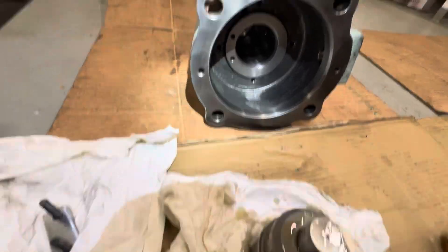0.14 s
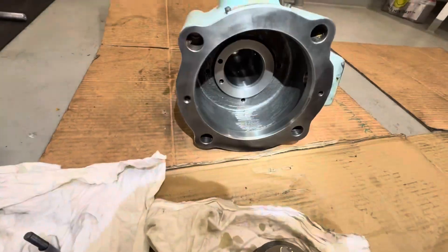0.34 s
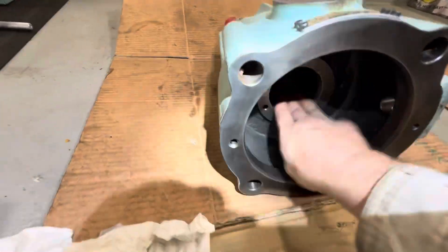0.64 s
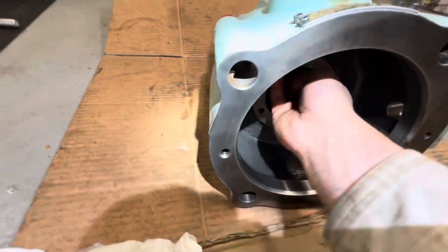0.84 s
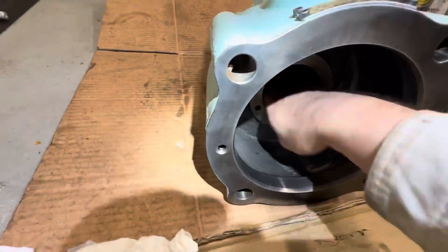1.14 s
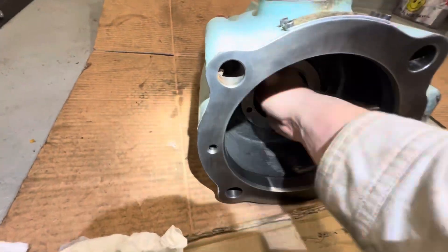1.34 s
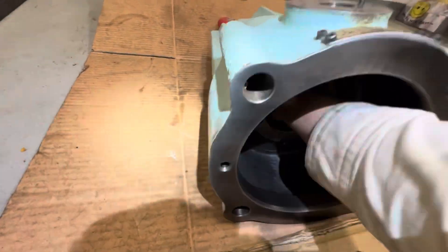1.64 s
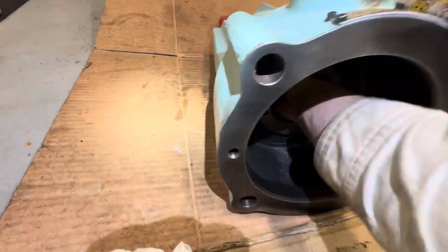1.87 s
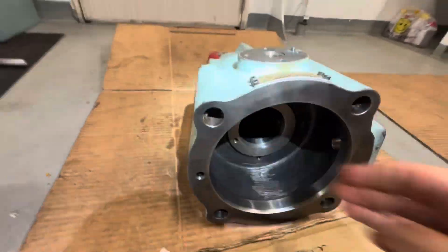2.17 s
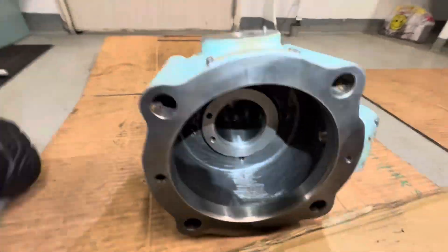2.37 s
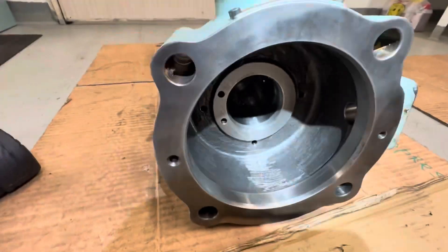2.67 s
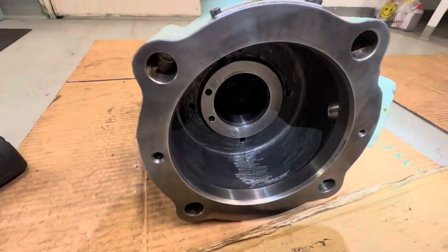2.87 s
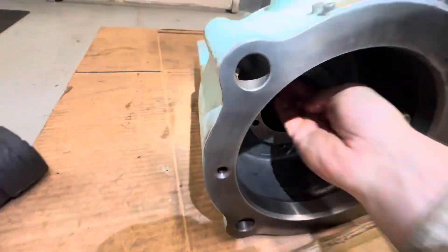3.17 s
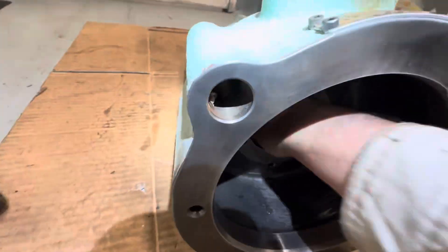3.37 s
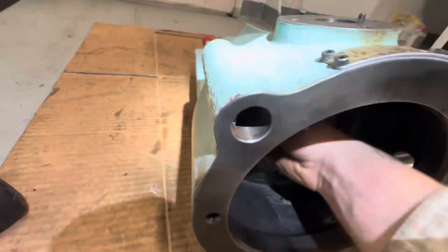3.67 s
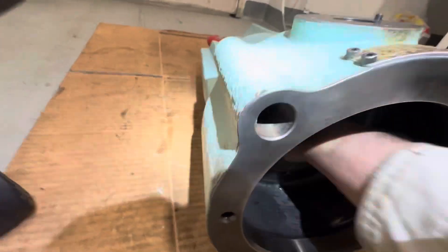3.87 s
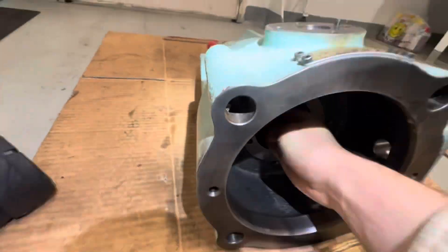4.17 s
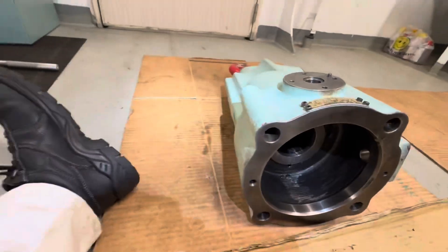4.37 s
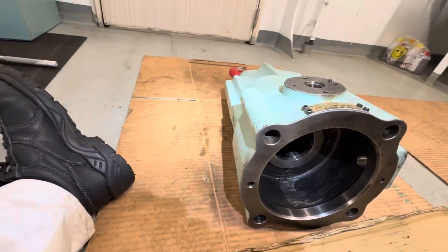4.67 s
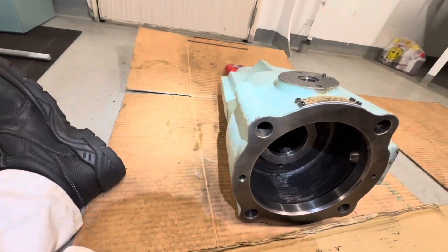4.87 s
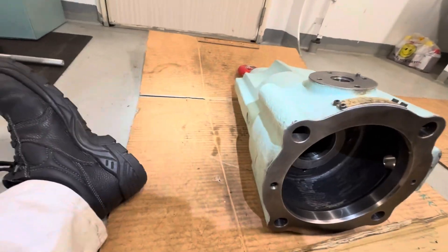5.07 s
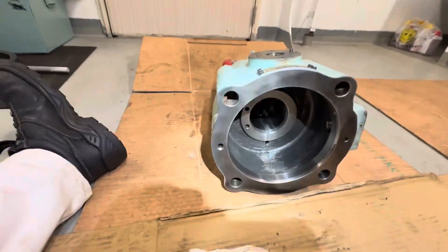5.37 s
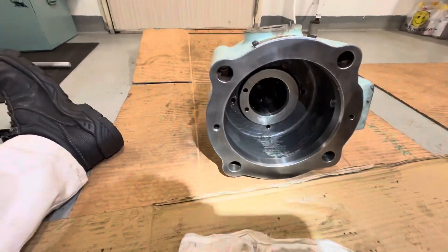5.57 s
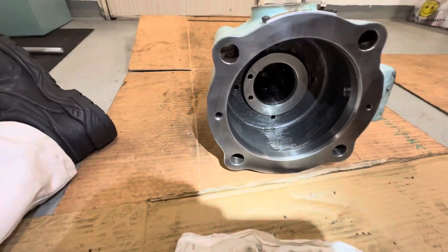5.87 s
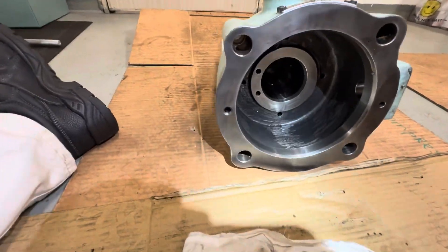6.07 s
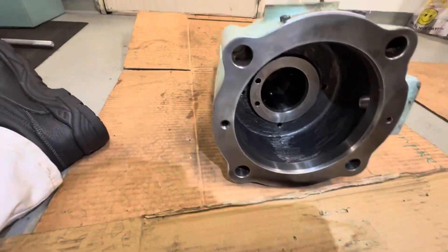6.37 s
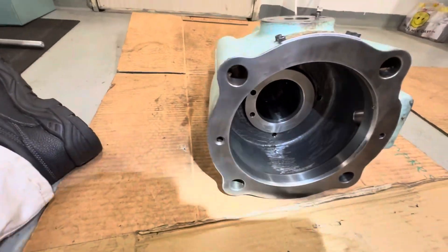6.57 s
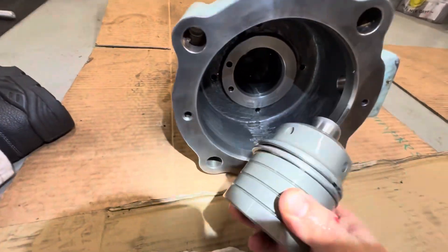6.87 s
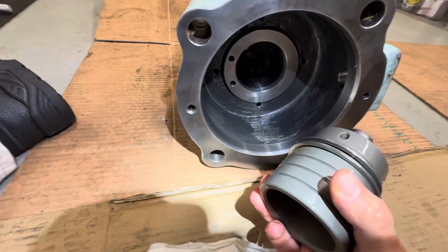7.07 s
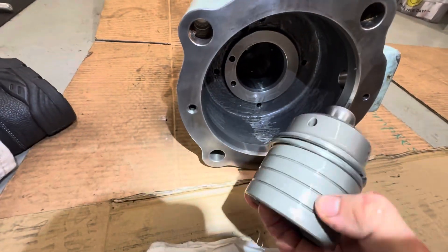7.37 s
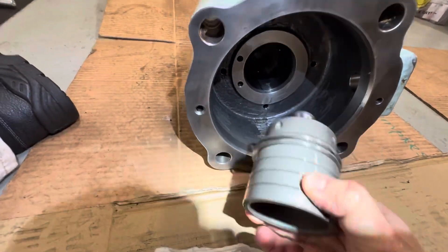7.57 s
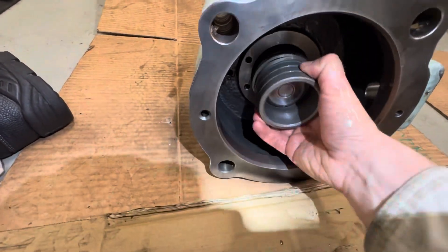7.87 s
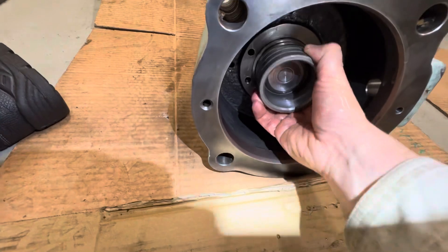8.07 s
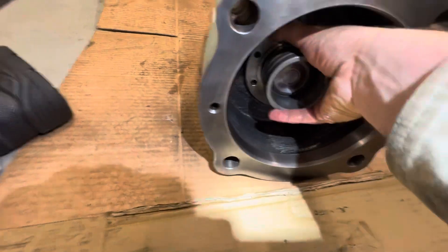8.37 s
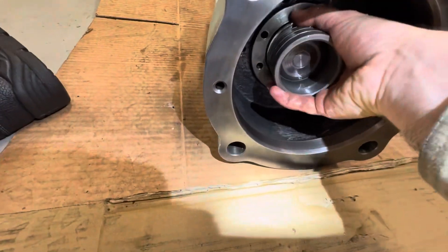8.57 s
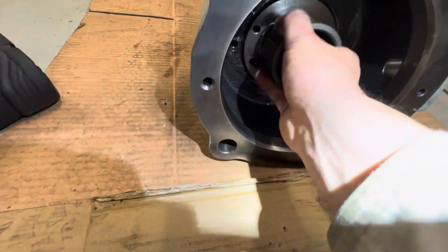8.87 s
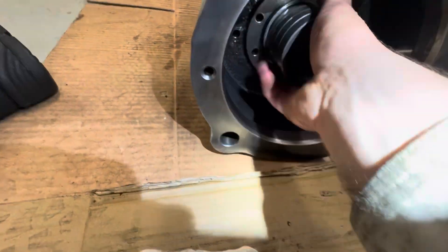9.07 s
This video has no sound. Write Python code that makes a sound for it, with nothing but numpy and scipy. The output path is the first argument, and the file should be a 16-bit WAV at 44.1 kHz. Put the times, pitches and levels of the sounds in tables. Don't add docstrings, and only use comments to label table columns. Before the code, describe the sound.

Inside a steel ship workshop, engine rumble drones throughout, with a wavering low boom, a higher hum and soft ventilation hiss. Faint hands scuff over cardboard, then dry rags rustle. Late on, small steel parts click and knock, a dull thud follows, and a piston slides into its bore with a barely audible rubbing hiss. One handheld phone microphone.

```python
import sys
import numpy as np
from scipy import signal
from scipy.fft import rfft, irfft, next_fast_len
from scipy.io import wavfile
from scipy.ndimage import uniform_filter1d, map_coordinates

SR = 44100
rng = np.random.default_rng(int(sys.argv[2]) if len(sys.argv) > 2 else 0)


def makeup_ratio(level_db):
    decades = np.asarray(level_db, float) / 20
    return 10 ** decades


def transcribe(signal):
    frames = np.atleast_2d(signal).T
    limited = np.clip(frames, -1, 1)
    pcm = np.round(limited * 32767).astype(np.int16)
    wavfile.write(sys.argv[1], SR, pcm)


N = 406144

# [t/s, peak level/dB, f/Hz, length/s]
BOOM_SWELLS = [(0.07, -36.0, 86.8, 0.055), (0.23, -29, 88.1, 0.07), (0.58, -34.0, 87.8, 0.32),
               (1.1, -36, 85.4, 0.047), (1.47, -45, 86.9, 0.29), (1.83, -34.5, 89.93, 0.063),
               (2.12, -35.5, 89.2, 0.28), (2.59, -38, 89.5, 0.061), (3.02, -37, 86.33, 0.37),
               (3.31, -33, 87.7, 0.06), (3.72, -30, 86.84, 0.19), (3.98, -32, 85.8, 0.17),
               (4.1, -28, 85.76, 0.068), (4.31, -28.5, 86.65, 0.07), (4.47, -34.5, 84.0, 0.057),
               (4.72, -36, 88, 0.034), (4.9, -33.5, 88.5, 0.18), (5.14, -27.0, 87.2, 0.12),
               (5.45, -38, 88.2, 0.65), (5.66, -34, 87.7, 0.12), (5.94, -30, 87.9, 0.055),
               (6.47, -31, 86.17, 0.11), (6.87, -34.5, 87.2, 0.68), (7.33, -36.5, 86.5, 0.21),
               (7.75, -33.5, 87.46, 0.23), (8.07, -31, 87.6, 0.066), (8.32, -35, 87.87, 0.52),
               (8.46, -27, 87.3, 0.043), (8.76, -28.5, 85.54, 0.11), (9.03, -27, 85.7, 0.12)]
# [t/s, peak level/dB, f/Hz, length/s]
HUM_SWELLS = [(0.14, -43.0, 166.6, 0.16), (0.38, -42.5, 166.8, 0.063), (0.66, -46.0, 165.2, 0.44),
              (1.21, -49.5, 163.7, 0.48), (2.06, -47.5, 165.4, 0.4), (2.47, -42.0, 162.6, 0.16),
              (2.82, -53.5, 165.0, 0.99), (3.57, -42.5, 165.5, 0.07), (4.26, -42.5, 164.4, 0.055),
              (4.54, -40, 164.6, 0.21), (4.65, -51, 165.3, 0.05), (4.92, -42.5, 164.0, 0.12),
              (5.18, -50.5, 164.3, 0.22), (5.37, -42, 165.9, 0.056), (5.65, -42, 164.5, 0.36),
              (5.93, -41, 164.4, 0.087), (6.55, -46.5, 163.6, 0.51), (7.3, -44.5, 164.0, 0.63),
              (8.0, -44.5, 164.9, 0.25), (8.2, -50.5, 165.0, 0.06), (8.32, -40.5, 164.3, 0.08),
              (8.53, -46.5, 162.3, 0.13), (8.91, -44.5, 165.0, 0.13), (9.14, -41.5, 161.6, 0.2)]
BOOM_REST_DB, HUM_REST_DB = -39.5, -51

# [f/Hz, width/Hz, level/dB]
DEEP_MODES = [(26.1, 5.5, -11), (36.3, 7.7, 0.5), (47.3, 11, -13), (57.7, 17, 1.5)]
UPPER_MODES = [(118.3, 10, 0.5), (140, 14, -5.5), (175.8, 13, -7.5), (200.4, 11.5, -5), (214, 8.2, -10.5),
               (246.3, 6.7, -10.5)]
DEEP_DB, UPPER_DB = -35.5, -41
SETTLE_S = 0.35

# [f/Hz, level/dB]
DUCT_COLOUR = [(130, -27.5), (220, -4), (309, -6.5), (348, -12), (374, -8), (574, -18.5), (706, -20),
               (772, -23), (831, -17.5), (1040, -22), (1900, -19.5), (2410, -27), (3530, -27.5),
               (5340, -41), (7500, -48), (9750, -78), (16500, -120)]
# [f/Hz, width/Hz, level/dB]
PANEL_MODES = [(297, 21.5, 4.5), (366, 23, -0.5), (500, 10, 2), (536, 19, 4), (735, 16, 5.5),
               (813, 27, 3.5), (913, 32, 3.5), (991, 15, 5), (1350, 27, 2), (1562, 27, 2), (2804, 23, 2),
               (3490, 110, -10), (3820, 38, -1.5), (4500, 200, 3.5), (7350, 15, 1.5)]
AIR_DB = -49.5

# [f/Hz, level/dB]
WHINES = [(9449, -99), (9993, -102), (10168, -103)]
# [t/s, level/dB]
PHONE_TURN = [
    (0, -14.5),
    (4, -9),
    (7.5, -0.5),
    (8, -3),
    (9.21, -3),
]

# [t/s, peak level/dB, body level/dB, sheen level/dB], the last two relative
SCUFFS = [(0.419, -63, 0, -1.5), (0.472, -69.5, -8, -0.5), (1.366, -63, 3, -2.5), (1.424, -66.5, 0, 1),
          (1.53, -58.5, 1, -2), (1.672, -64, -1, 0), (1.852, -57, -3, 3), (2.108, -58.5, -1, 2),
          (2.295, -61.5, 0, 2), (2.451, -59.5, -0.5, 2.5), (2.596, -59.5, 0, 2), (2.736, -61, -1, 1),
          (2.963, -47, -0.5, 0), (3.171, -62.5, 4.5, -1.5), (5.837, -60.5, -4, -3), (6.298, -65, -4, 0),
          (6.424, -54, 2.5, -3), (6.553, -59.5, -0.5, 5), (6.705, -54, -4.5, 2.5), (7.293, -48.5, 0.5, 0.5),
          (7.474, -61, -6, 0), (7.579, -53, 0, 0)]
# [f/Hz, level/dB]
EDGE_COLOUR = [(2000, -38), (3500, 8.5), (6000, -2), (8000, -6), (12000, -25)]
SHEEN_COLOUR = [(5000, -29), (9000, -1), (12000, -4.5), (15700, 0.5)]
BODY_COLOUR = [(300, -31), (650, 1.5), (1100, -2), (1500, 0.5), (1900, 1.5), (2500, -7), (3600, -7),
               (5500, -36.5)]
EDGE_RISE_S, EDGE_HOLD_S = 0.002, 0.034
BODY_RISE_S, BODY_HOLD_S = 0.005, 0.032
SCUFF_T60_S = 0.34

# [t/s, peak level/dB, centre f/Hz, 60 dB fade/s]
RUSTLES = [(4.122, -67, 6013, .1), (4.4, -69, 6923, .08), (4.693, -63, 6000, 0.08),
           (5.578, -62.5, 4990, .15), (5.70, -69.5, 15580, .3), (5.74, -71, 15600, .3),
           (5.918, -70.5, 14500, .06), (5.918, -61, 5870, 0.24), (5.94, -69, 7200, 0.14),
           (6.034, -72, 14500, .06), (6.034, -58, 4510, 0.2), (6.045, -68, 7000, 0.19),
           (6.368, -60.5, 5810, 0.24), (6.369, -69, 14500, .1), (6.373, -54, 2500, 0.16),
           (6.585, -59, 1800, 0.093)]
# [t/s, peak level/dB, f/Hz, 60 dB fade/s]
TICKS = [(6.9993, -58, 6780, 0.007), (6.9998, -58, 8600, .009), (6.9993, -62, 10000, .004),
         (6.9993, -65, 13800, .005), (7.1765, -57, 15100, 0.0045), (7.1765, -63, 9500, .004),
         (7.1838, -55, 15000, .004), (7.1838, -61, 9500, .004), (7.193, -64, 15000, .004),
         (7.234, -53, 15260, 0.0051), (7.234, -58, 9470, .005), (7.311, -50, 14500, 0.0056),
         (7.70, -62, 10100, 0.0084), (7.71, -52, 6600, .008), (7.711, -56, 7500, .008),
         (7.71, -60, 15000, 0.005), (7.747, -60, 9730, .008)]
# [t/s, peak level/dB, f/Hz, 60 dB fade/s]
KNOCKS = [
    (6.9993, -38, 2870, 0.012),
    (6.9993, -50, 1600, .012),
    (7.25, -44, 899.3, 0.016),
    (7.801, -37, 475, .025),
    (7.801, -41, 795, 0.018),
    (7.801, -43, 1750, .02),
    (7.802, -51, 2600, .012),
]

# [t/s, level/dB]
STROKE = [
    (8.25, -88),
    (8.33, -64.5),
    (8.449, -63),
    (8.561, -64),
    (8.7, -81),
]
# [f/Hz, width/Hz, level/dB]
BORE_MODES = [(2970, 690, -2), (1500, 900, -3), (5200, 1500, -12)]

# [f/Hz, level/dB]
MIC_COLOUR = [(3000, -30), (6000, -6.5), (8000, 1), (11000, 1), (13500, -1.5), (15700, 0)]
MIC_HISS_DB, MIC_TOP_HZ = -77.5, 15720


def unit(x):
    return x / np.sqrt(np.mean(x ** 2) + 1e-20)


def curves(rows):
    times, *columns = np.transpose(rows)
    return [np.interp(np.arange(N) / SR, times, column) for column in columns]


def wobble(rate):
    points = rng.standard_normal(int(N * rate / SR) + 4)
    return map_coordinates(points, [np.arange(N) * rate / SR])


def along(points):
    hz, db = np.transpose(points)
    return lambda f: makeup_ratio(np.interp(np.log(f + 1), np.log(hz + 1), db))


def modes(table):
    def response(f):
        power = 0
        for centre, width, db in table:
            power = power + (makeup_ratio(db) * f * width) ** 2 / ((centre ** 2 - f * f) ** 2 + (f * width) ** 2)
        return np.sqrt(power)
    return response


def noise(response, count=N):
    m = next_fast_len(count + 8192)
    spectrum = rfft(rng.standard_normal(m)) * response(np.fft.rfftfreq(m, 1 / SR))
    return unit(irfft(spectrum, m)[:count])


def steady(x, seconds):
    power = np.abs(uniform_filter1d(x ** 2, int(seconds * SR)))
    return x / np.sqrt(power + 1e-3)


def add(track, start_s, burst):
    part = track[round(start_s * SR):][:len(burst)]
    part += burst[:len(part)]


def ringing_mode(swells, rest_db, centre_hz, width_hz, waver_hz, skirt_db):
    start, db, hz, length = np.transpose(swells)
    t = np.arange(0, N + 200, 200) / SR
    bells = makeup_ratio(db) * np.exp(-4 * np.log(2) * ((t[:, None] - start) / length) ** 2)
    rest_power = makeup_ratio(rest_db) ** 2
    pitch = (bells ** 2 @ hz + rest_power * centre_hz) / ((bells ** 2).sum(axis=1) + rest_power)
    loudness = makeup_ratio(rest_db) + bells.sum(axis=1)
    pitch, loudness = curves(np.transpose([t, pitch, loudness]))
    phase = 2 * np.pi * np.cumsum(pitch + waver_hz * wobble(12)) / SR
    tone = np.sqrt(2) * np.sin(phase)
    resonance = modes([(centre_hz, width_hz, 0)])
    skirt = steady(noise(lambda f: resonance(f) ** 2), 0.15)
    return loudness * unit(tone + makeup_ratio(skirt_db) * skirt)


def boom_and_hum():
    boom = ringing_mode(BOOM_SWELLS, BOOM_REST_DB, centre_hz=87.5, width_hz=24, waver_hz=2.105, skirt_db=-6.5)
    hum = ringing_mode(HUM_SWELLS, HUM_REST_DB, centre_hz=165, width_hz=15.4, waver_hz=1.606, skirt_db=-4.5)
    return boom + hum


def rumble():
    deep = noise(lambda f: modes(DEEP_MODES)(f) ** 1.467 * f ** 2 / (f ** 2 + 18 ** 2))
    upper = noise(lambda f: modes(UPPER_MODES)(f) ** 1.344)
    return makeup_ratio(DEEP_DB) * steady(deep, SETTLE_S) + makeup_ratio(UPPER_DB) * steady(upper, SETTLE_S)


def ventilation():
    knots = rng.standard_normal(1200)

    def ripple(f):
        return makeup_ratio(np.minimum(f / 1500, 1.2) * map_coordinates(knots, [f / 14]))

    hiss = noise(lambda f: along(DUCT_COLOUR)(f) * ripple(f) * np.sqrt(1 + modes(PANEL_MODES)(f) ** 2))
    breathing_db = 0.4 * wobble(0.8) + 0.59 * wobble(2.92) + 0.19 * wobble(11)
    return hiss * makeup_ratio(AIR_DB + breathing_db)


def motor_whines():
    t = np.arange(N) / SR
    whine = np.zeros(N)
    for hz, db in WHINES:
        level = makeup_ratio(db + 3.5 + 1.5 * wobble(4))
        whine += level * np.sin(2 * np.pi * hz * t + 0.6 * wobble(9))
    return makeup_ratio(curves(PHONE_TURN)[0]) * whine


def scuffs():
    t = np.arange(SR // 2) / SR
    edge, sheen, body = np.zeros((3, N))

    def shape(rise, hold):
        fade = makeup_ratio(-60 * np.maximum(t - hold, 0) / SCUFF_T60_S)
        return fade * (1 - np.exp(-t / rise))

    grit_shape = shape(EDGE_RISE_S, EDGE_HOLD_S)
    body_shape = shape(BODY_RISE_S, BODY_HOLD_S)
    for start, db, body_db, sheen_db in SCUFFS:
        add(edge, start, makeup_ratio(db - 8.5) * grit_shape)
        add(sheen, start, makeup_ratio(db + sheen_db - 15.5) * grit_shape)
        add(body, start, makeup_ratio(db + body_db + 2) * body_shape)
    layers = edge * noise(along(EDGE_COLOUR))
    layers += sheen * noise(along(SHEEN_COLOUR))
    layers += body * noise(along(BODY_COLOUR))
    roughness_db = 0.86 * wobble(300) + 0.38 * wobble(70)
    return makeup_ratio(roughness_db) * layers


def rustles():
    out = np.zeros(N)
    t = np.arange(SR // 4) / SR
    for start, db, hz, t60 in RUSTLES:
        resonance = modes([(hz, 3800, 0)])
        puff = noise(lambda f: resonance(f) ** 3, count=len(t))
        fade = makeup_ratio(db - 1.5 - 60 * t / t60 + 1.8 * wobble(150)[:len(t)])
        add(out, start, fade * puff * (1 - np.exp(-t / 0.0014)))
    return out


def ticks_and_knocks():
    out = np.zeros(N)
    t = np.arange(SR // 10) / SR
    onset = 1 - np.exp(-t / 0.00031)
    for start, db, hz, t60 in TICKS + KNOCKS:
        add(out, start, makeup_ratio(db - 60 * t / t60) * np.sin(2 * np.pi * hz * t) * onset)
    return out


def piston_slide():
    stroke_db = np.interp(np.arange(N) / SR, *np.transpose(STROKE), left=-150, right=-150)
    rubbing = noise(lambda f: modes(BORE_MODES)(f) ** 2)
    return makeup_ratio(stroke_db + 1.2 * wobble(30)) * rubbing


def scene():
    mix = boom_and_hum() + rumble() + ventilation() + motor_whines()
    mix += scuffs() + rustles() + ticks_and_knocks() + piston_slide()
    return mix[None]


def roll_off(x):
    return signal.sosfilt(signal.butter(12, 16260, fs=SR, output="sos"), x)


def record(dry):
    wet = dry + makeup_ratio(MIC_HISS_DB) * noise(along(MIC_COLOUR))
    m = next_fast_len(N + 4096)
    passed = np.fft.rfftfreq(m, 1 / SR) < MIC_TOP_HZ
    wet = irfft(rfft(wet, m) * passed, m)[:, :N]
    return roll_off(wet)


dry = scene()
out = record(dry)
transcribe(out)
```